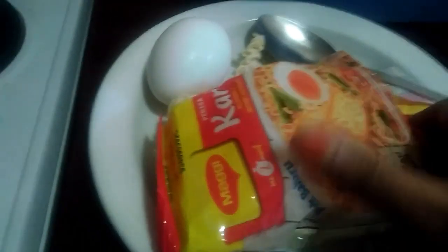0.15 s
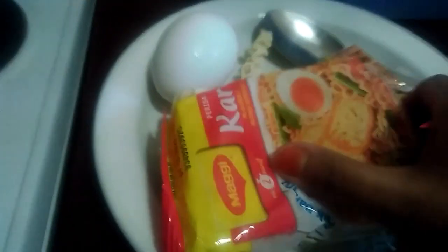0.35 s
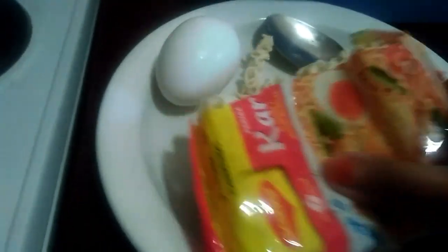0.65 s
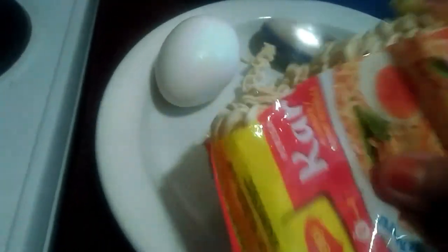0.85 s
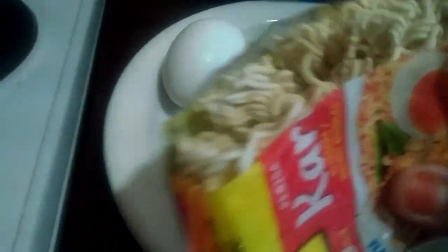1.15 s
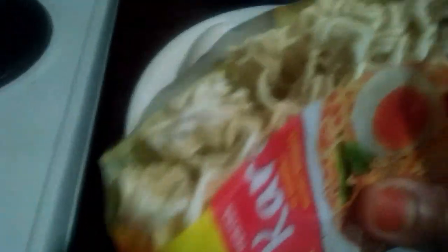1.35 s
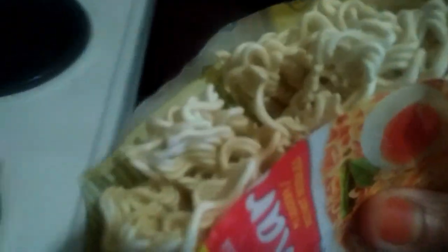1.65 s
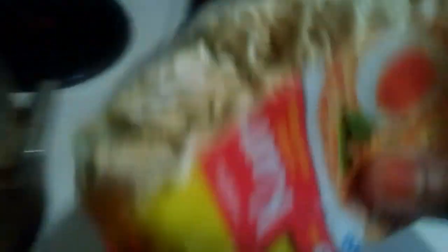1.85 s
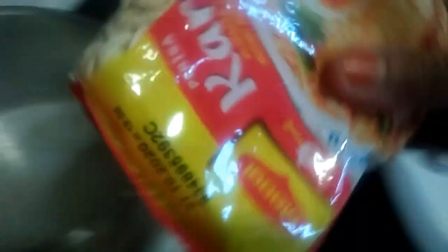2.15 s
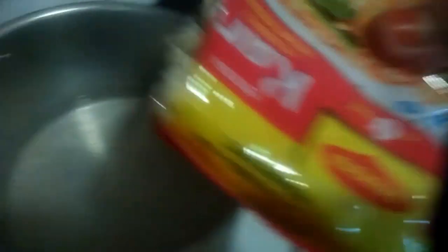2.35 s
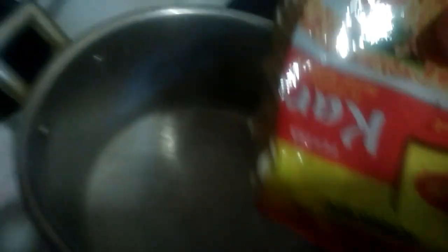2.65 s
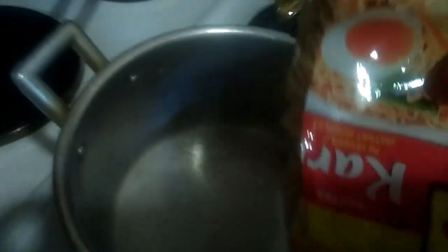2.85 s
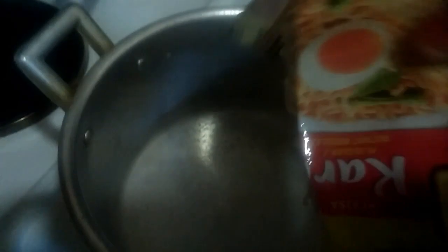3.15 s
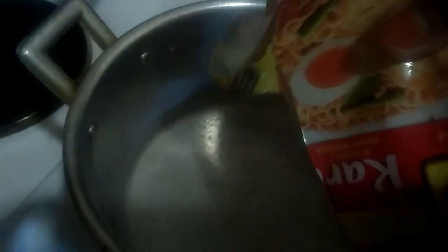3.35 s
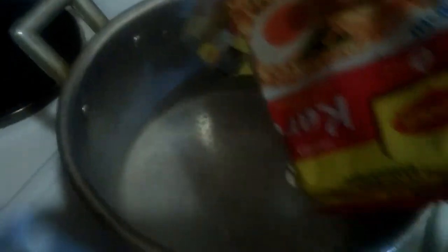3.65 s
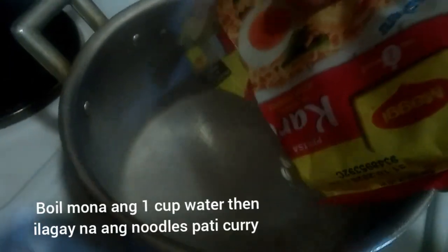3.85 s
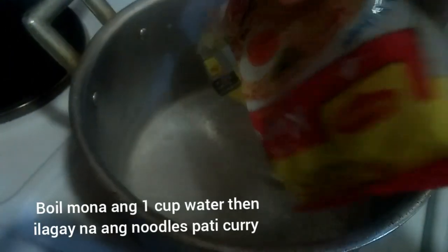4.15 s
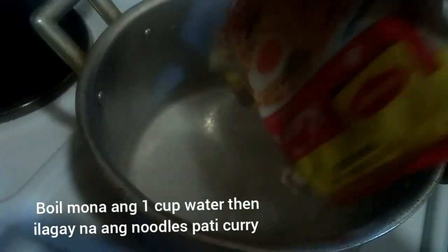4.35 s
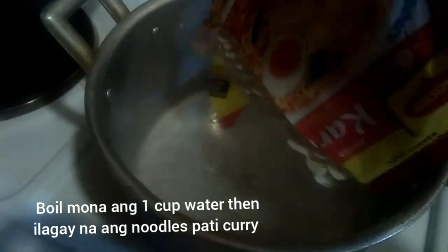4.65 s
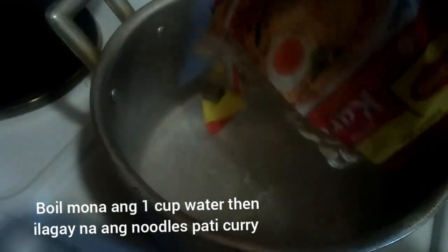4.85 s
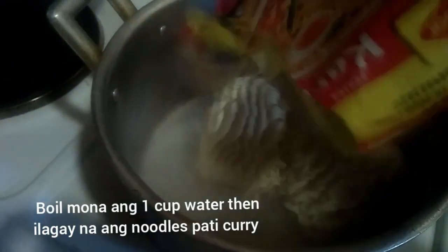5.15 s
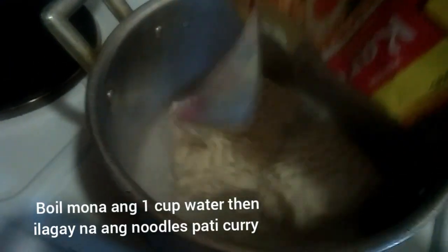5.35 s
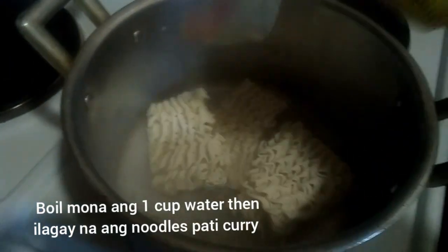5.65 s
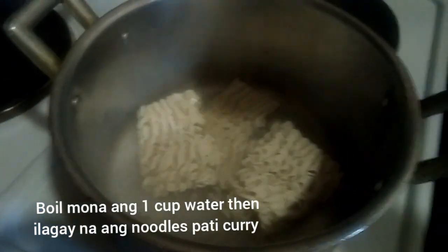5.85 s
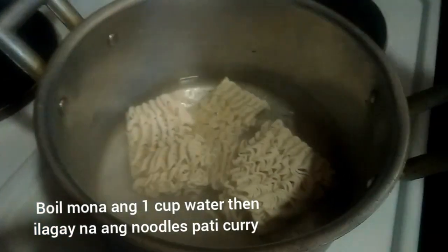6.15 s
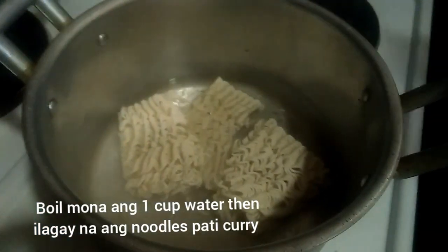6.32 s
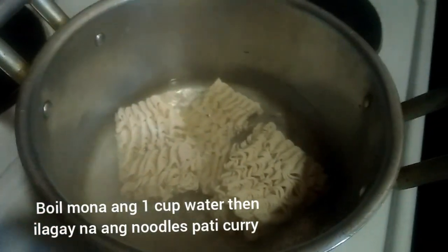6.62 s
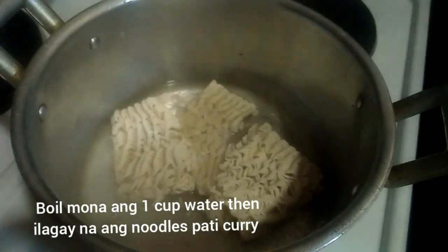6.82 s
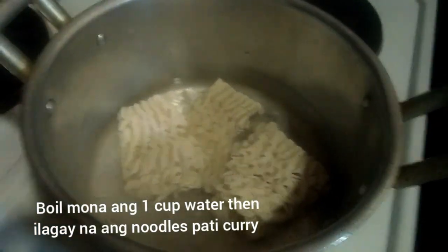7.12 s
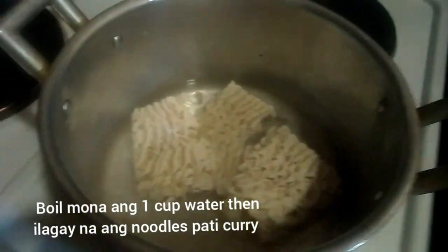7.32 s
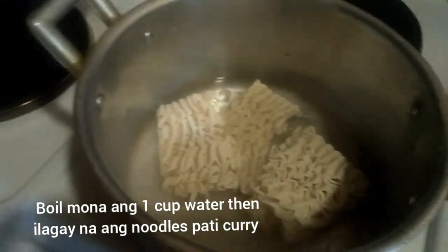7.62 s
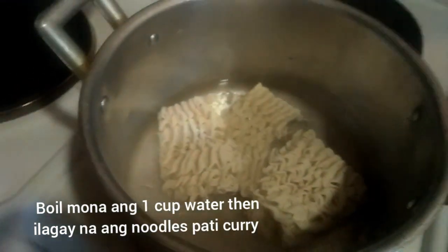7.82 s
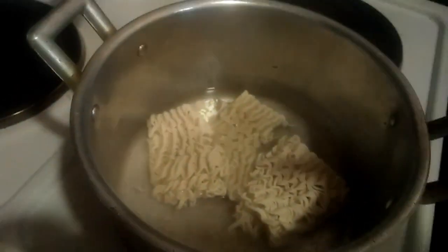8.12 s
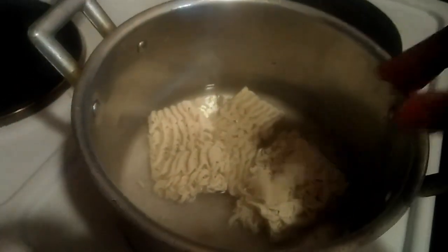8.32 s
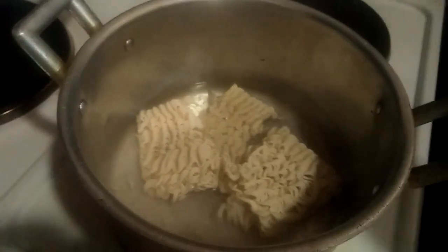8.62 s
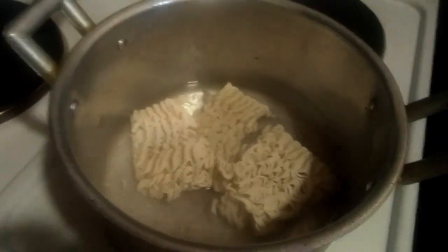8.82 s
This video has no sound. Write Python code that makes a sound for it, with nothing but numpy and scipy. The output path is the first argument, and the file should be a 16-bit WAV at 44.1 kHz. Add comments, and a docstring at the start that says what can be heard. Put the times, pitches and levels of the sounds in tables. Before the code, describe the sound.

A thin plastic noodle packet snaps and rustles close up, a steel spoon rattles sharply on a plate, then rustling peaks as noodles drop into a pot.

```python
"""A thin plastic noodle packet snaps and rustles in a hand close to a phone: its creases are bursts of hiss
with a few cycles of taut film, over a hiss of sliding. A steel spoon rattles on a plate as contacts ring a
bank of modes; the noodle blocks drop into a pot as crumbling noise that wakes low modes. Behind them lie
patchy room noise and a faint wavering motor hum. Sparse echoes make the kitchen around the near sounds."""
import sys
import numpy as np
from scipy import signal
from scipy.fft import rfft, irfft
from scipy.io import wavfile
from scipy.ndimage import uniform_filter1d

SR = 44100
rng = np.random.default_rng(int(sys.argv[2]) if len(sys.argv) > 2 else 0)


def to_wav(sig):
    """Store sig (one row per channel, or 1-D mono) as 16-bit WAV at the path in sys.argv[1].

    Samples outside -1..1 are clipped; the rate is SR.
    """
    pcm = np.clip(np.atleast_2d(sig), -1, 1) * 32767
    pcm = np.round(pcm).astype(np.int16)
    wavfile.write(sys.argv[1], SR, pcm.T)  # frames by channels


N = 396018


def gain_of(db):
    """Amplitude gain of a level in dB."""
    return 10 ** (np.asarray(db) / 20)


def unit_rms(x):
    """Scale a signal to rms 1."""
    return x / np.sqrt(np.mean(x ** 2) + 1e-20)


def smoothed(x, first, second, axis=-1):
    """Average twice over windows given in steps, leaving a slow wander."""
    return uniform_filter1d(uniform_filter1d(x, size=first, axis=axis), size=second, axis=axis)


def curve_at(points, hz):
    """Read a curve between its points, along a log frequency axis."""
    f, value = np.transpose(points)
    return np.interp(np.log(hz + 1), np.log(f + 1), value)


def add_at(mix, s, sound):
    """Lay a sound into the mix at a time in seconds."""
    part = mix[round(s * SR):][:len(sound)]
    part += sound[:len(part)]


def taps_of(points):
    """Causal impulse response of a spectrum, energy 1; the log gain's Hilbert transform gives its phase."""
    log_gain = np.log(gain_of(curve_at(points, abs(np.fft.fftfreq(4096, 1 / SR)))))
    taps = np.fft.ifft(np.exp(np.conj(signal.hilbert(log_gain)))).real[:2048]
    return taps / np.linalg.norm(taps)


def ring(x, hz, t60):
    """One decaying mode; white drive of rms 1 gives rms 1."""
    r = np.exp(-np.log(1000) / (max(t60, .0006) * SR))
    pole = r * np.exp(2j * np.pi * hz / SR)
    return np.sqrt(2 * (1 - r * r)) * signal.lfilter([1], [1, -pole], x).imag


def sparks(count, per_s, spread_db):
    """Random clicks of either sign, a few of them large, together at rms 1."""
    where, size, sign = rng.random((count, 3)).T
    height = gain_of(spread_db * np.minimum(-np.log(size + 1e-9), 4))
    return unit_rms((where < per_s / SR) * height * np.sign(sign - .5))


def swell(t, ms):
    """Quick rise and slower fall, peak 1 after a third of ms, silent before zero."""
    u = 3000 * np.maximum(t, 0) / max(ms, .4)
    return u * np.exp(1 - u)


# Tilt of the room noise. Each row: frequency in Hz, relative density in dB.
ROOM_TILT = [(20, -7), (60, -8), (130, -3), (220, -7.5), (300, -8), (430, -11.5), (1660, -14), (2200, -22),
             (14200, -37)]
# Orders of the motor hum. Each row: multiple of the shaft speed, level in dB.
HUM_ORDERS = [(2, -77), (4, -72.5), (5, -76.5), (10, -78)]
ROOM_DB, THROB_DB = -73, -80.5
SHAFT_HZ, SHAFT_DRIFT = 28.4, .018  # drift: rms share of the speed


def air():
    """Quiet, patchy room noise and the hum of an appliance motor whose speed and orders waver."""
    noise = rng.standard_normal((N, 2 + len(HUM_ORDERS))).T
    wavers = [unit_rms(smoothed(x, 1500, 1000)) for x in noise[1:]]
    turns = np.cumsum(SHAFT_HZ * (1 + SHAFT_DRIFT * wavers[0])) / SR
    hum = sum(gain_of(db + 3.2 * waver) * np.sin(2 * np.pi * order * turns)
              for (order, db), waver in zip(HUM_ORDERS, wavers[1:]))
    push = 1 + np.cos(2 * np.pi * turns)  # one push a turn
    throb = gain_of(THROB_DB) * push * unit_rms(ring(noise[0, ::-1], 130, 0.011))
    spectrum = gain_of(curve_at(ROOM_TILT, np.fft.rfftfreq(N, 1 / SR)))
    room = unit_rms(irfft(rfft(noise[0]) * spectrum, N))
    _, _, z = signal.stft(room, SR, nperseg=1024)
    patches = uniform_filter1d(rng.standard_normal(z.shape), size=8, axis=1)  # along time
    patches = unit_rms(uniform_filter1d(patches, size=20, axis=0))  # along frequency
    room = signal.istft(z * gain_of(0.84 * patches), SR, nperseg=1024)[1][:N]
    return gain_of(ROOM_DB) * room + np.sqrt(2) * hum + throb


GRIP_EDGE_DB, GRIP_RISE_DB_S = 11, 1501  # drop at both ends in dB; speed of onset in dB per second
# Settling after letting go, in dB per second: fall of the ticks, of the panels and of the crackle.
SETTLE = [329, 452, 899]


def grip(t, start, top, end):
    """Tick, panel and crackle of one grip in dB under their peaks: swell, ease, then settle."""
    turns_s = [start, max(top, start + .001), max(end, top + .002)]
    held_db = np.interp(t, turns_s, [-GRIP_EDGE_DB, 0, -GRIP_EDGE_DB])
    onset_db = GRIP_RISE_DB_S * np.maximum(start - t, 0)
    return held_db - onset_db - np.outer(SETTLE, np.maximum(t - end, 0))


# Grips that set the film rustling. Each row: start in seconds, strongest moment in seconds, let-go in
# seconds, tick level in dB, panel level in dB, crackle from 0 (sliding) to 1 (creasing).
GRIPS = [(0.175, 0.184, 0.28, -55.5, -47.5, .6), (0.355, 0.428, 0.8, -45.5, -43.5, .8),
         (0.477, 0.557, 0.67, -31.5, -35, 0.59), (0.635, 0.656, 0.83, -37.5, -37.5, .7),
         (0.804, 0.867, 0.85, -42.5, -49, .6), (1.083, 1.1, 1.315, -43, -38.5, 0.69),
         (1.299, 1.328, 1.54, -60.5, -51.5, 0.84), (1.502, 1.569, 1.7, -78, -62, 0.74),
         (1.888, 2.037, 2.11, -58, -50, .6), (2.123, 2.147, 2.224, -52, -45.5, .6),
         (2.24, 2.286, 2.35, -60, -57.5, .6), (2.446, 2.575, 2.63, -70.5, -64.5, 0.36),
         (2.633, 2.7, 2.87, -71, -68.5, 0.43), (2.996, 3.05, 3.27, -59, -59, .6),
         (3.14, 3.414, 3.61, -47.5, -44.5, .6), (3.557, 3.694, 3.79, -55.5, -50.5, .4),
         (3.808, 3.88, 4.02, -52, -50.5, 0.63), (4.045, 4.102, 4.27, -60.5, -55, 0.45),
         (4.218, 4.242, 4.35, -36, -32.5, 0.92), (4.396, 4.554, 4.54, -33, -33, 0.556),
         (4.574, 4.648, 4.83, -36, -37.5, 0.5), (4.948, 4.96, 5.06, -47.5, -39, .8),
         (5.072, 5.122, 5.34, -26.5, -28, 0.41), (5.298, 5.303, 5.46, -43.5, -51.5, 0.54),
         (5.571, 5.629, 5.733, -61.5, -63.5, .3), (6.052, 6.066, 6.18, -59.5, -61.5, .4),
         (6.777, 6.867, 7.07, -59, -64, .5), (6.926, 7.003, 7.25, -46.5, -43.5, 0.76),
         (7.073, 7.181, 7.235, -51, -70, 0.4), (8.439, 8.494, 8.54, -62.5, -60, 0.41)]


def handling():
    """Tick and panel gains of all grips, powers added, and the crackle share of the loudest ones."""
    t = np.arange(0, N + 64, 64) / SR
    power = []
    for start, top, end, tick_db, panel_db, _ in GRIPS:
        levels_db = np.array([tick_db, panel_db, tick_db])[:, None]
        power.append(gain_of(grip(t, start, top, end) + levels_db) ** 2)
    power = np.array(power)
    tick, panel = power[:, 0].sum(0), power[:, 1].sum(0)
    crackle = np.clip(np.array(GRIPS)[:, 5], 0, 1) @ power[:, 2] / (tick + 1e-30)
    return [np.interp(np.arange(N) / SR, t, x) for x in (np.sqrt(tick), np.sqrt(panel), crackle)]


def hiss_gain(clicks):
    """Stretch each click into a noise envelope of about 1 ms."""
    return np.sqrt(abs(signal.lfilter([.035], [1, -.965], clicks ** 2)))


# Bright hiss of a crease. Each row: frequency in Hz, level in dB.
TICK_COLOUR = [(3000, -31), (4200, -7.5), (6500, -8), (9500, 1.5), (12000, -0.5), (14200, -8)]
# Body of a flapping panel of film. Each row: frequency in Hz, level in dB.
PANEL_COLOUR = [(150, -30), (300, -21), (600, -10), (1000, -2.5), (1400, 3.5), (2300, 0.5), (3500, -2),
                (5000, -22), (7500, -37)]
# Hiss of sliding film. Each row: frequency in Hz, level in dB.
SLIDE_COLOUR = [(3000, -28), (5000, -10.5), (7000, -8), (9500, -0.5), (12000, -9.5), (14200, -8)]


def rustle():
    """Small creases flip in clumps, each a tick and a panel flap, over a hiss of sliding film."""
    tick, panel, crackle = handling()
    clumps = gain_of(1.5 * crackle * unit_rms(smoothed(rng.standard_normal(N), 500, 300)))
    creases = sparks(N, per_s=520, spread_db=4.0)
    slide = 1 - .6 * crackle  # creasing film slides less

    hiss = rng.standard_normal(N)
    tint_of = rng.integers(0, 4, N)  # each small crease takes one of four tints
    tinted = sum(ring(hiss * hiss_gain(creases * (tint_of == k)), hz, 0.0015)
                 for k, hz in enumerate(np.geomspace(4000, 12500, num=4)))
    ticks = signal.oaconvolve(0.56 * crackle * unit_rms(tinted), taps_of(TICK_COLOUR))[:N]
    ticks += signal.oaconvolve(.5 * slide * hiss, taps_of(SLIDE_COLOUR))[:N]

    panel_clicks = creases + 3.8 * sparks(N, per_s=400, spread_db=4.0)
    panel_of = rng.integers(0, 12, N)
    # each panel pitch grows louder and softer slowly, at random
    pitch_wander = unit_rms(smoothed(rng.standard_normal((N // 64 + 1, 12)), 40, 25, axis=0))
    pitch_gain = np.repeat(gain_of(3.5 * pitch_wander), 64, axis=0)[:N].T
    rub = 0.41 * rng.standard_normal(N)
    flaps = sum(ring((panel_clicks * (panel_of == k) + rub) * pitch_gain[k], hz, 0.0072)
                for k, hz in enumerate(np.geomspace(450, 4200, num=12)))
    scuff = (0.6 * crackle * hiss_gain(creases) + 0.54 * slide) * rng.standard_normal(N)
    flaps = signal.oaconvolve(unit_rms(flaps) + scuff, taps_of(PANEL_COLOUR))[:N]
    # dull handling rumble
    grasp = gain_of(-29.5) * unit_rms(ring(flaps + rng.standard_normal(N), 150, 0.025))
    return tick * unit_rms(ticks * clumps) + panel * (unit_rms(flaps * clumps) + grasp * clumps)


# Creases of the film that flip. Each row: time in seconds, tick level in dB, panel level in dB,
# panel pitch in Hz, length in ms.
SNAPS = [(0.1963, -39, -38.5, 1310, 3.7), (0.2202, -26.5, -29, 1210, 1.9), (0.354, -20, -39, 3200, 2.6),
         (0.3705, -33.5, -42.5, 1850, 3.3), (0.3774, -32.5, -45, 1410, 10.4), (0.4148, -22, -25, 1240, 5.3),
         (0.4337, -31.5, -36, 1270, 7.5), (0.4473, -24.5, -29, 1370, 4.9), (0.477, -31, -27.5, 1480, 4.3),
         (0.4843, -19, -26, 1280, 3.8), (0.518, -16, -58.5, 865, 0.73), (0.538, -27, -32.5, 1330, 8.1),
         (0.556, -30.5, -29, 1280, 4), (0.566, -20.5, -25, 1260, 4.8), (0.61, -40.5, -32.5, 1310, 3),
         (0.6188, -26, -38.5, 2910, 5.5), (0.626, -31.5, -33, 2320, 2.9), (0.6442, -30.5, -33, 1412, 2.5),
         (0.662, -28.5, -31.5, 1300, 4.8), (0.6877, -18.5, -27, 1360, 3.3), (0.71, -21.5, -38, 1390, 1.7),
         (0.7264, -10.5, -39, 1270, 2.14), (0.761, -31.5, -36, 1360, 4.7),
         (0.7963, -50.5, -32.5, 1193, 3.7), (0.8411, -16, -34, 2480, 3.4), (0.87, -23.5, -46, 1270, 6.9),
         (1.116, -42, -34.5, 2660, 3.1), (1.1472, -23, -29.5, 1800, 3.9), (1.168, -12.5, -32, 1130, 2.2),
         (1.2533, -25, -28, 1250, 1.44), (1.28, -25, -28, 1770, 4.7), (1.446, -44.5, -48, 1330, 9.7),
         (1.4959, -26.5, -42.5, 2730, 4), (1.7564, -62, -41.5, 1040, 3.6), (1.939, -45.5, -50.5, 1350, 4.6),
         (1.9884, -28.5, -39, 1000, 4.9), (1.9945, -46.5, -30, 2540, 2.6),
         (2.0087, -31.5, -34.5, 1360, 3.4), (2.0163, -20.5, -29.5, 2030, 4.1),
         (2.132, -17, -22, 1570, 2.64), (2.161, -30, -28.5, 1260, 3.2), (2.203, -43, -47.5, 1090, 6.2),
         (2.283, -56, -62, 4060, 4.8), (2.3104, -40, -37, 1650, 3.6), (2.385, -75, -56, 1690, 2.6),
         (2.4508, -52.5, -43, 1890, 2.6), (2.4594, -57, -49.5, 1850, 3.5), (2.666, -82, -48.5, 1076, 4.2),
         (2.6983, -37, -49, 2366, 4.5), (2.8178, -60, -46.5, 1730, 3.4), (3.0178, -35, -38.5, 1590, 5.6),
         (3.0429, -32.5, -31, 1920, 2.6), (3.104, -32, -39, 1700, 5.4), (3.1144, -81, -36, 1120, 3.4),
         (3.135, -24.5, -31, 2090, 1.4), (3.225, -42, -39.5, 1210, 5.4), (3.263, -26.5, -46.5, 1700, 7.7),
         (3.315, -32, -33, 1250, 4.7), (3.342, -28, -48, 2850, 7.7), (3.3952, -21, -32, 990, 2.5),
         (3.4537, -32, -29.5, 1780, 2.1), (3.485, -36, -50, 2030, 4.5), (3.5055, -31.5, -33, 1750, 6.3),
         (3.6024, -33, -43.5, 1456, 6.7), (3.694, -36, -45.5, 1190, 6.6), (3.7954, -29, -46, 1980, 4.6),
         (3.8486, -16, -31, 1960, 2.7), (3.93, -43, -44.5, 1470, 4.5), (3.965, -23, -26.5, 2230, 4.4),
         (4.062, -33, -43, 1534, 10), (4.0763, -31, -26.5, 2880, 0.66), (4.1075, -25.5, -31, 2370, 2.3),
         (4.15, -50, -43, 1730, 4.8), (4.207, -31, -44, 1770, 6.6), (4.2217, -19, -30.5, 1700, 0.5),
         (4.259, -21, -31, 1770, 5.1), (4.296, -52, -37, 1375, 15), (4.3065, -7.5, -26.5, 1800, 3.2),
         (4.405, -19, -40.5, 1890, 6.3), (4.4548, -12, -32.5, 1500, 5), (4.498, -25, -56, 1680, 1.3),
         (4.5466, -24, -29.5, 3140, 4.3), (4.5993, -20.5, -33.5, 1354, 5.6),
         (4.6445, -32, -32.5, 1650, 7.4), (4.6863, -15, -31, 1350, 2.4), (4.741, -14.5, -38, 1410, 3.4),
         (4.7601, -13.5, -23, 2480, 0.76), (4.8249, -16.5, -24, 2870, 2.37), (4.861, -14.5, -30, 2430, 6.3),
         (4.895, -14.5, -28, 1679, 0.72), (4.9259, -34, -36, 1950, 4.4), (4.956, -80, -31.5, 1230, 3.08),
         (4.985, -23, -35.5, 1290, 6.65), (4.997, -22.5, -37.5, 2310, 6.8), (5.0338, -32, -34.5, 1160, 8),
         (5.058, -24, -35.5, 1329, 4.2), (5.074, -19, -34.5, 3690, 6.4), (5.0945, -12, -27, 2440, 1.66),
         (5.1174, -13.5, -29.5, 1160, 3.6), (5.1281, -10, -27.5, 1230, 0.89), (5.1434, -13, -25, 2170, 2.9),
         (5.1626, -12.5, -21.5, 3020, 2.3), (5.2185, -18, -31.5, 1500, 8), (5.2305, -17, -25, 810, 4),
         (5.233, -10.5, -19.5, 1620, 4.5), (5.265, -29, -32.5, 1900, 4.4), (5.3824, -29.5, -62, 3300, 8.4),
         (5.4228, -34, -35, 3110, 2.4), (5.623, -37, -45, 1231, 7.46), (5.871, -76, -61, 1620, 3.3),
         (5.92, -79, -63, 1600, 2.5), (5.975, -79, -62, 1870, 2.5), (6.0596, -63, -44.5, 816.5, 3.9),
         (6.074, -36.5, -48, 1090, 4.9), (6.203, -61, -49.5, 1730, 3.7), (6.5293, -77.5, -51.5, 870, 4.86),
         (6.78, -56.5, -55, 1580, 4.5), (6.8251, -34.5, -52.5, 2670, 5.9), (6.9663, -28.5, -41, 1780, 9),
         (7.0324, -20.5, -39, 1650, 1.8), (7.0948, -47, -42, 1960, 7.5), (7.196, -34, -45, 673, 6.5),
         (7.656, -48, -58, 4880, 8.5), (8.4349, -40, -46, 770, 4), (8.4868, -45, -41.5, 698, 3),
         (8.4877, -49, -50, 1350, 7.2)]


def snaps():
    """Each crease gives a burst of hiss and a few cycles of its taut panel; weaker creases follow it."""
    t = np.arange(2200) / SR
    out = np.zeros(N)
    chance, traits = rng.standard_normal((len(SNAPS), 2, 2500)), rng.random((len(SNAPS), 8))
    settled = slice(250, 250 + len(t))  # past the filters' run-in
    hisses = signal.fftconvolve(chance[:, 0], taps_of(TICK_COLOUR)[None], axes=1)[:, settled]
    flaps = signal.fftconvolve(chance[:, 1], taps_of(PANEL_COLOUR)[None], axes=1)[:, settled]
    for (s, tick_db, panel_db, hz, ms), hiss, flap, trait in zip(SNAPS, hisses, flaps, traits):
        colour, upper = trait[:2]
        # every crease has its own tint
        hiss = 0.41 * hiss + 0.26 * unit_rms(ring(hiss, 7000 + 5000 * colour, 0.0013))
        followers = sum(gain_of(-14.0 - 1300 * late - 10 * weak) * swell(t - late, 0.91)
                        for late, weak in zip(0.0023 + 0.025 * trait[2:5], trait[5:]))
        crack = swell(t - ms / 2500, 0.4)  # sharp, near the height of the swell
        tick = hiss * (swell(t, ms) + crack + followers)
        tones = np.sin(2 * np.pi * hz * t) + .5 * np.sin(2 * np.pi * hz * (1.1 + 0.5 * upper) * t)
        # slow creases scrunch more than they ring
        scrunch = (.45 + .15 * ms) * (.55 * flap + .7 * unit_rms(ring(flap, hz, .004)))
        panel = (1.4 * tones + scrunch) * swell(t, 0.93 * ms) + 0.49 * flap * followers
        add_at(out, s - .0006, gain_of(tick_db) * tick + gain_of(panel_db) * panel)
    return out


# Soft blows. Each row: time in seconds, blow level in dB, crumbling time to -60 dB in seconds.
THUDS = [(0.5, -57, 0.24), (0.886, -39.5, 0.34), (4.257, -53.5, 0.1), (4.304, -53, 0.041),
         (5.11, -42.5, 0.18), (5.229, -38.5, 0.34), (5.288, -42, 0.16), (5.334, -40.5, 0.15),
         (5.503, -49, 0.1)]
# Low modes of pot, plate and stove top. Each row: frequency in Hz, level in dB, decay to -60 dB in seconds.
POT_MODES = [(84.5, -5.5, 0.1), (122.65, -3, 0.056), (200, -6.5, 0.11), (306.2, 1, 0.084), (550, -3, 0.01)]


def thuds():
    """Soft, crumbling blows wake the low modes of pot, plate and stove top."""
    t, blows = np.arange(SR // 4) / SR, np.zeros(N)
    for s, blow_db, t60 in THUDS:
        crumble = rng.standard_normal(len(t))
        add_at(blows, s, gain_of(blow_db - 60 * t / max(t60, .02)) * crumble)
    blows = signal.sosfilt(signal.butter(2, 60, "high", fs=SR, output="sos"), blows)
    out = np.zeros(N)
    for hz, db, t60 in POT_MODES:
        # ringing twice keeps the skirts steep; the root sets the peak gain of the first pass to 1
        first_pass = ring(blows, hz, t60 / 3) * np.sqrt(3 * np.log(1000) / (t60 * SR))
        out += gain_of(db) * ring(first_pass, hz, t60)
    return out


BOUT_FALL_DB_S, BOUT_RISE_DB_S = 259.5, 2495.5  # first speed of fall and speed of onset, dB per second
BOUT_STALL_S = 0.14  # the rocking stalls ever faster on this time scale


def chatter_gain(t, bouts):
    """Each bout starts abruptly, holds, and dies away as the rocking settles."""
    power = 0
    for s, hold, db in bouts:
        after = np.maximum(t - s - hold, 0)
        onset_db = BOUT_RISE_DB_S * np.maximum(s - t, 0)
        fall_db = BOUT_FALL_DB_S * after * (1 + after / BOUT_STALL_S)
        power = power + gain_of(db - onset_db - fall_db) ** 2
    return np.sqrt(power)


# Modes of spoon and plate. Each row: frequency in Hz, decay to -60 dB in seconds, then the level in dB
# for each of the four ways the spoon lies while it rattles.
SPOON_MODES = [(1110, 0.025, -11, -17, -11, -11), (1370, 0.04, -20, -22, -12, -16),
               (2288, 0.06, -22, 0, -14, -21), (2390, 0.045, -9, -22, -6, -19),
               (3857, 0.05, -11, -23, -13, -28), (4015, 0.045, -12, -19, -6, -26),
               (5260, 0.07, -19, -36, -20, -20), (5505, 0.06, -17, -36, -12, -20),
               (5800, 0.07, -16, -20, -4, -9), (6100, 0.04, -14, -30, -16, -10),
               (6309, 0.06, -15, -28, -13, -12), (6947, 0.08, -15, -28, -10, -9),
               (7305, 0.08, -9, -34, -4, -5), (8487, 0.08, -19, -28, 0, -3), (9098, 0.13, 0, -27, -11, -2),
               (9150, 0.08, -4, -27, -1, -11), (9488, 0.13, -3, -33, -14, -20),
               (9612, 0.08, -17, -37, -6, -9), (10304, 0.13, -4, -38, -20, -18),
               (10904, 0.13, -9, -27, -9, 0), (11213, 0.08, -12, -36, -20, -1),
               (11569, 0.08, -18, -40, -10, -14), (12737, 0.08, -13, -41, -25, -15),
               (13725, 0.08, -32, -39, -5, -14), (14021, 0.08, -21, -26, -4, -6)]
# Bouts of chatter, one list for each way the spoon lies. Each row: start in seconds, hold in seconds,
# level in dB.
RATTLES = [
    [(.884, 0.08, -14), (1.006, 0.043, -20.5), (1.097, 0.0041, -32)],
    [(7.579, 0.0058, -48), (7.6, 0.023, -42.5), (7.688, 0.0049, -47)],
    [(7.726, 0.0083, -28), (7.744, 0.0058, -23.5), (7.8, 0.0043, -34)],
    [(7.844, 0.0021, -48), (7.857, 0.0054, -26.5), (7.885, 0.035, -44.5)],
]
# Toneless contact noise for each way the spoon lies. Each row: tick level in dB, knock level in dB.
CLATTER = [(-8.5, -17.5), (-25, -31), (-8, -19.5), (-8.5, -20)]
FIRST_BLOW_DB = 14.5  # over the level of its bout


def rattle(seat):
    """The rocking spoon chatters and scrapes on the plate; every contact feeds the modes."""
    bouts = RATTLES[seat]
    start = bouts[0][0]
    t = start + np.arange(SR // 2) / SR
    contacts = sparks(len(t), per_s=900, spread_db=2) + .6 * rng.standard_normal(len(t))
    chatter = unit_rms(contacts) * chatter_gain(t, bouts)
    for s, _, db in bouts:  # the first contact of a bout is a clean blow
        chatter[max(round((s - start) * SR), 0)] += gain_of(db + FIRST_BLOW_DB)

    modes = np.array(SPOON_MODES)
    shares = gain_of(modes[:, 2 + seat]) / modes[:, 1] ** 0.13  # wide modes carry more power
    wander = uniform_filter1d(rng.standard_normal((len(t), len(modes))), size=600, axis=0).T
    coupling = gain_of(2.5 * unit_rms(wander) - 1)  # the contact point wanders over the modes' nodes
    tones = sum(share * ring(chatter * c, hz, t60)
                for share, c, (hz, t60) in zip(shares, coupling, modes[:, :2]))

    tick_db, knock_db = CLATTER[seat]
    contact_taps = gain_of(tick_db) * taps_of(TICK_COLOUR) + gain_of(knock_db) * taps_of(PANEL_COLOUR)
    clatter = signal.oaconvolve(chatter, contact_taps)[:len(t)]
    thin = signal.butter(3, 900, "high", fs=SR, output="sos")  # the spoon's ringing is kept out of the bass
    return start, signal.sosfilt(thin, tones / np.linalg.norm(shares) + clatter)


# The bowl of the spoon lands flat on the plate. Each row: time in seconds, level in dB.
KNOCKS = [(.9005, -3), (0.908, -4.5)]


def knocks():
    """Single dull cracks of steel on china, each one short filter response."""
    out = np.zeros(N)
    for s, db in KNOCKS:
        add_at(out, s, gain_of(db) * (taps_of(PANEL_COLOUR) + .6 * taps_of(TICK_COLOUR)))
    return out


# Decay of the kitchen. Each row: frequency in Hz, time to -60 dB in seconds.
KITCHEN_DECAY = [(300, 0.3), (1300, 0.11), (3500, 0.16), (9000, 0.13)]


def kitchen(x):
    """Sparse echoes of random sign, each band dying at its own speed."""
    taps, count = np.zeros(SR // 2), SR // 40 - 12
    where = 200 + 20 * np.arange(count) + rng.integers(0, 20, count)
    taps[where] = rng.choice([-1., 1.], count)
    hz, t, z = signal.stft(taps, SR, nperseg=256)
    fade = gain_of(-60 * t / curve_at(KITCHEN_DECAY, hz)[:, None])
    tail = signal.istft(z * fade, SR, nperseg=256)[1]
    return signal.oaconvolve(x, tail / np.linalg.norm(tail))[:N]


# Stereo width. Each row: frequency in Hz, gain in dB of the part that differs between the ears.
SIDE_WIDTH = [(3900, -56), (4300, -13), (8000, -6), (14000, -6)]


def scattered(x):
    """The part that differs between the ears: same envelope, scrambled phase, mostly treble."""
    hz, _, z = signal.stft(x, SR, nperseg=256)
    scatter = np.exp(2j * np.pi * rng.random(z.shape))
    width = gain_of(curve_at(SIDE_WIDTH, hz))[:, None]
    return signal.istft(z * scatter * width, SR, nperseg=256)[1][:N]


FLOOR_SIDE_DB = 8  # the background is less alike in the two ears than the near sounds


def scene():
    """All sources sit in the middle; the treble of packet and background differs between the ears."""
    floor = air()
    packet = rustle() + snaps()
    spoon = knocks()
    for seat in range(len(RATTLES)):
        add_at(spoon, *rattle(seat))
    near = packet + thuds() + spoon
    mid = near + gain_of(-10.0) * kitchen(near) + floor
    side = scattered(packet + gain_of(-2.0) * kitchen(packet) + gain_of(FLOOR_SIDE_DB) * floor)
    return np.array([mid + side, mid - side])


# Steep loss of top treble above 14 kHz. Each row: frequency in Hz, level in dB.
TOP_TREBLE = [(14150, -3), (14500, -36), (15600, -39.5)]
START_S, EDGE_HZ, OFFSET = .193, 15628, -.0002  # opening time; band limit; constant shift of the wave


def record(dry):
    """The sound opens late, sits slightly off zero and has little above 14 kHz; then the band limit."""
    fade_in = np.clip((np.arange(N) / SR - START_S) / 0.0011, 0, 1)
    opened = (dry + OFFSET) * fade_in
    hz = np.linspace(0, SR / 2, num=513)
    colour = signal.firwin2(511, hz, gain_of(curve_at(TOP_TREBLE, hz)), fs=SR)
    edge = signal.firwin(511, EDGE_HZ, window=("kaiser", 9), fs=SR)
    return signal.oaconvolve(opened, np.convolve(colour, edge)[None], "same")


dry = scene()
out = record(dry)
to_wav(out)
```